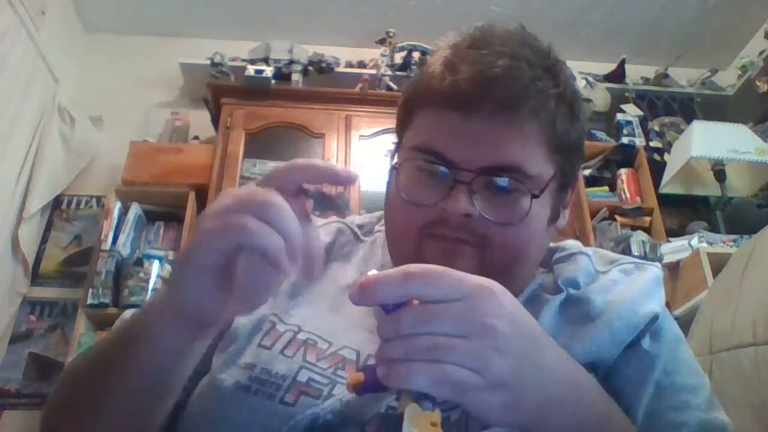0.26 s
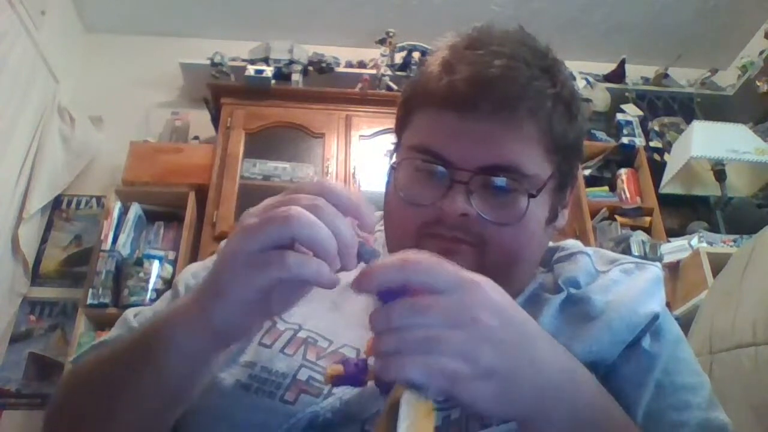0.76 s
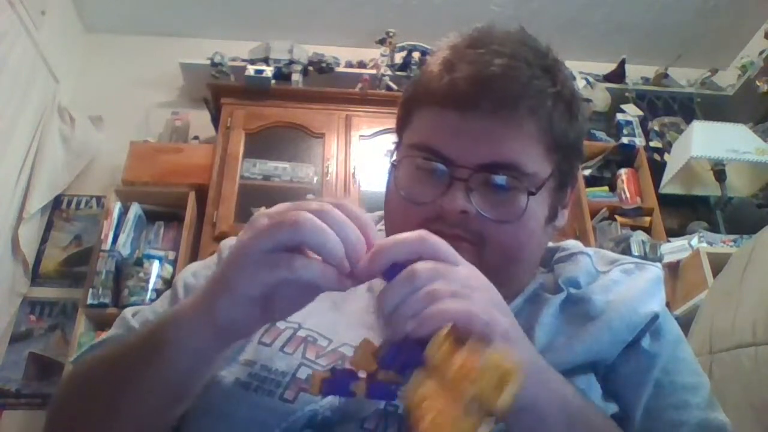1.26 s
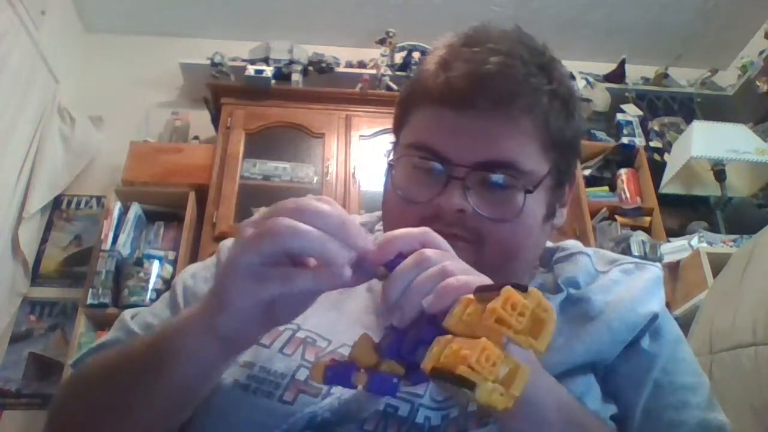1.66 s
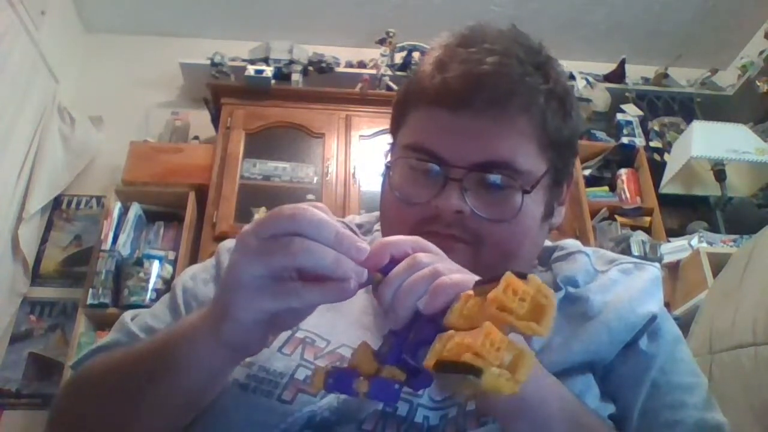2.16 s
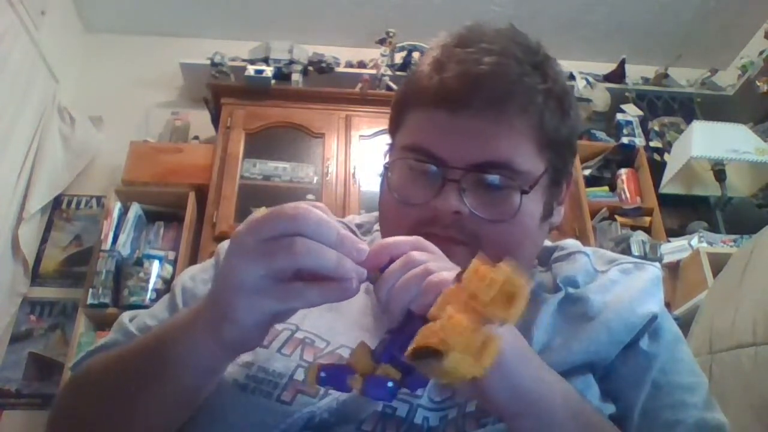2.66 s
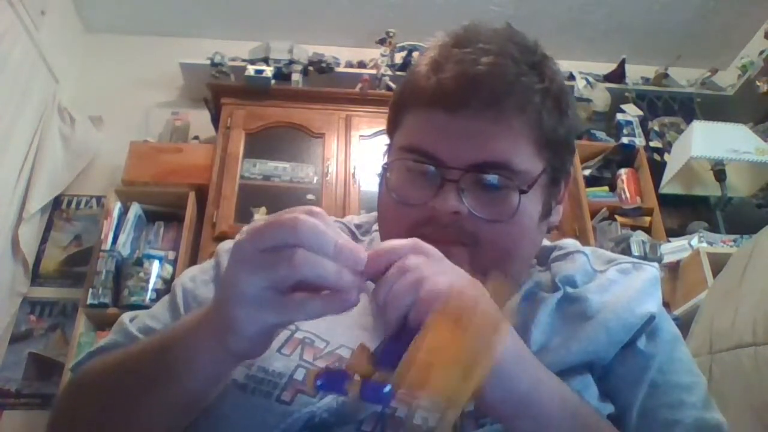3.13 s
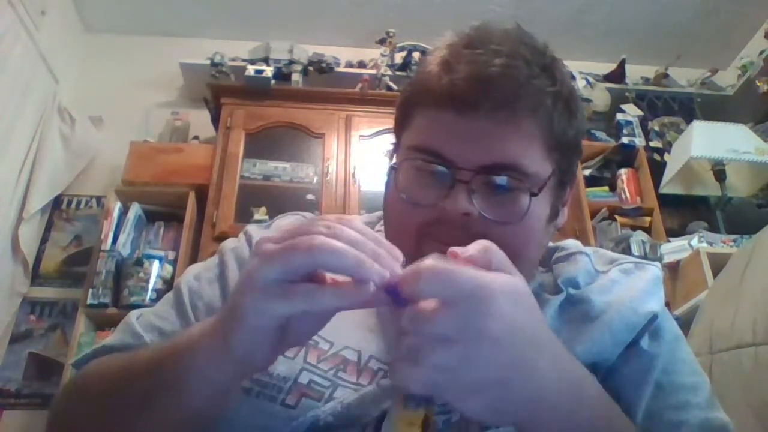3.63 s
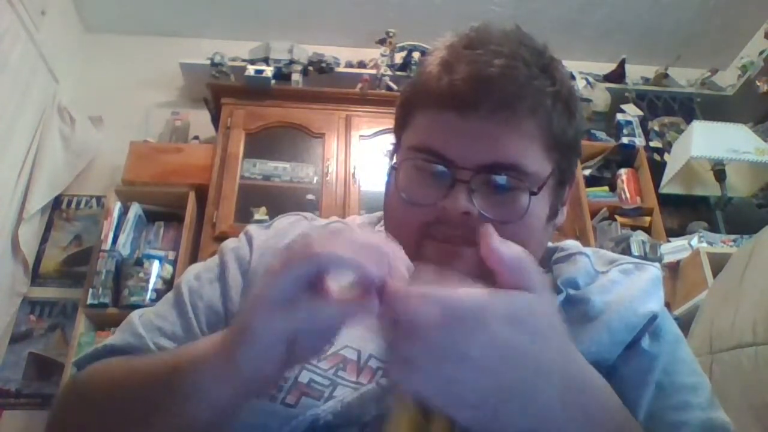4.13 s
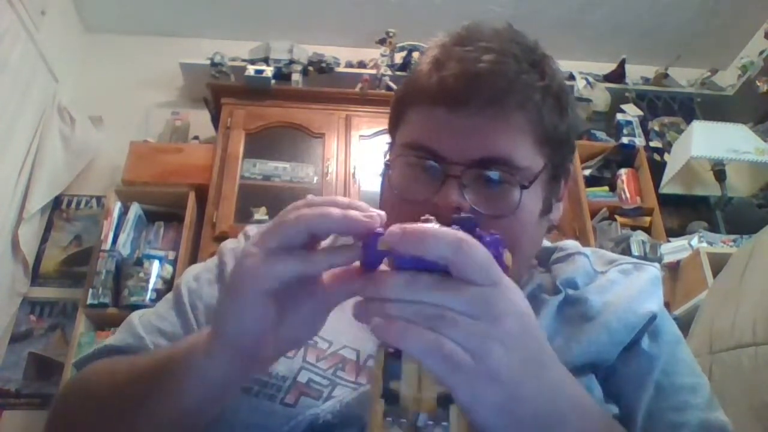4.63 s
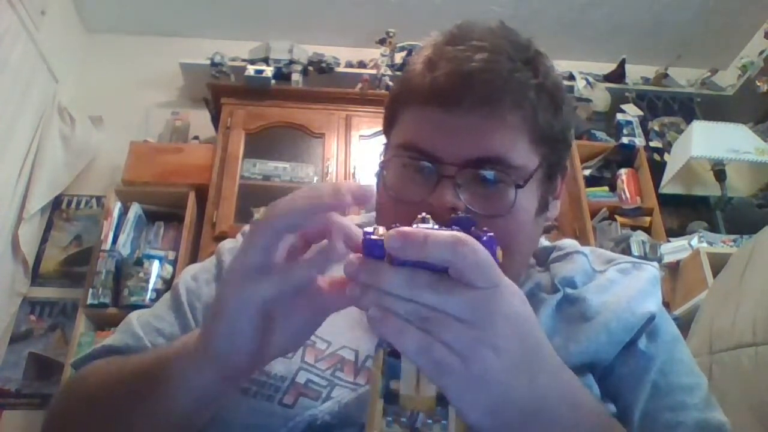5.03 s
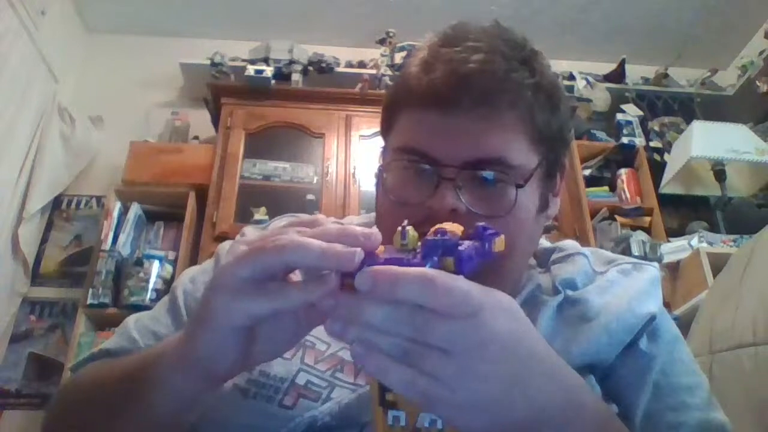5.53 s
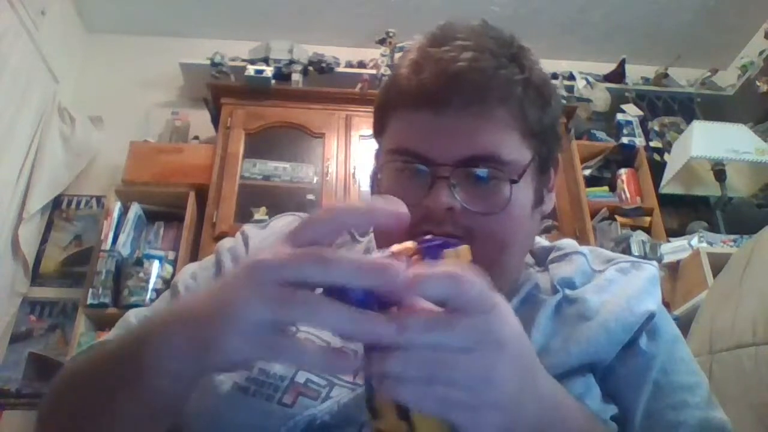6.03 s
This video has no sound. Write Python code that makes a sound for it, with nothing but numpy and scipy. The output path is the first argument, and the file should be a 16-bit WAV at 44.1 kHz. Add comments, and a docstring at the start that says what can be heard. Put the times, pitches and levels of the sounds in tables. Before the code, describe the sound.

Hands twist a small hard plastic toy close up: faint rubs and squeaks, hollow knocks, sharp bright snaps and light ticks in a quiet room.

```python
"""Hands work on a plastic toy figure, close to a laptop microphone, over rumble, hiss and a faint clock tick each second.
First fingers rub, a tab ticks, joints squeak and a bump leads to hollow knocks near 1.5 s; near 2.6 s a stiff joint
creaks and snaps, then knocks jolt the toy. Rubs, squeaks and light ticks follow, a knock at 4.7 s, a peg click
at 5.0 s, a last snap at 5.27 s and ticks. Parts are decaying modes plus cracking noise; rubs and bumps are swelling
noise. A noise suppressor holds the quiet down, opens on each snap and closes slowly."""
import sys
import numpy as np
from scipy import signal
from scipy.fft import rfft, irfft, next_fast_len
from scipy.io import wavfile
from scipy.ndimage import uniform_filter1d, map_coordinates

SR = 44100
rng = np.random.default_rng(int(sys.argv[2]) if len(sys.argv) > 2 else 0)


def generate_wav(signal):
    """Clip the signal to [-1, 1] and save it as 16-bit WAV at the path in sys.argv[1]."""
    frames = np.transpose(np.atleast_2d(signal))
    scaled = np.clip(frames, -1, 1) * 32767
    pcm = np.round(scaled).astype(np.int16)
    wavfile.write(sys.argv[1], SR, pcm)


N = 277124
TIME = np.arange(N) / SR
# All levels are set ahead of the suppressor; spectra are relative.
GRIP_HZ = 90.4  # how fast friction varies as the fingers catch and slide

# thud register of bumps, crack of the jolt: freq_hz, density_db (per Hz)
THUD_COLOUR = [(100, -38), (170, 0.5), (230, -0.5), (320, -7.5), (600, -39.5)]
# crack of the hollow shell and of the peg: freq_hz, density_db
SHELL_CRACK_COLOUR = [(200, -27), (450, -35), (680, -20), (1000, -33.5), (1280, -20), (1600, -4),
                      (2250, -2), (3000, -15), (4100, -3.5), (4900, -11), (7500, -30)]


def undb(db):
    """Decibels to gain."""
    return 10 ** (np.asarray(db) / 20)


def unit(x):
    """Scale to rms 1."""
    return x / np.sqrt(np.mean(x ** 2))


def colour(x, points):
    """Filter by (freq_hz, gain_db) points, interpolated over log frequency."""
    hz, db = np.transpose(points)
    size = next_fast_len(len(x))
    f = np.maximum(np.fft.rfftfreq(size, 1 / SR), 1)
    gain = undb(np.interp(np.log(f), np.log(hz), db))
    return irfft(rfft(x, size) * gain, size)[:len(x)]


def shade(x, points):
    """Colour a short sound without wrapping its start round to its end."""
    return colour(np.pad(x, (0, len(x))), points)[:len(x)]


def noise(points, size=N):
    """Coloured noise of rms 1."""
    return unit(colour(rng.standard_normal(size), points))


def swell(middle_s, half_length_s):
    """Gaussian rise and fall, down to exp(-2) at the half length."""
    return np.exp(-2 * np.minimum(((TIME - middle_s) / half_length_s) ** 2, 20))


def waver(hz, size=N):
    """Random wander of rms 1: straight lines between hz random values a second."""
    turns = np.arange(size) * hz / SR
    return unit(map_coordinates(rng.standard_normal(size), [turns], order=1))


def flicker(x, depth_db, top_hz=8000, size=512, frames=9):
    """Narrow bands waver, less so towards the top; output rms 1."""
    f, _, z = signal.stft(x, SR, nperseg=size)
    walk = uniform_filter1d(rng.standard_normal(z.shape), frames, axis=1)
    walk = unit(uniform_filter1d(walk, 2, axis=0))
    band_depth_db = depth_db / (1 + (f[:, None] / top_hz) ** 4)
    return unit(signal.istft(z * undb(band_depth_db * walk), SR, nperseg=size)[1][:N])


def add(out, start_s, x):
    """Mix a sound in at a time."""
    i = int(start_s * SR)
    out[i:i + len(x)] += x[:len(out) - i]


def background():
    """Room rumble and microphone hiss, each flickering band by band."""
    # low room noise: freq_hz, density_db (per Hz)
    rumble_colour = [(25, -39), (55, -34.5), (78, -1), (100, -3), (125, 1.5), (220, -1.5), (400, -12.5),
                     (700, -12.5), (1000, -19.5), (2000, -48)]
    # microphone noise: freq_hz, density_db (per Hz)
    hiss_colour = [(300, -16), (1200, -7.5), (1750, 2), (2800, -3.5), (3400, 0), (5500, -3), (7800, -6.5),
                   (8200, -3), (9600, 6.5), (12000, -0.5), (15600, -2.5)]
    rumble = undb(-63) * flicker(noise(rumble_colour), depth_db=3.0)
    hiss = undb(-50.5) * flicker(noise(hiss_colour), depth_db=3.5)
    return rumble + hiss


def clock():
    """A distant clock: one soft swell of coloured noise a second."""
    # clock tick: freq_hz, density_db (per Hz)
    tick_colour = [(800, -39), (1900, -10), (3000, -20), (3800, -15.5), (4050, -4.5), (4400, -16.5),
                   (6500, -19.5), (9000, -16)]
    first_s, half_length_s, level_db = 0.4305, 0.038, -46
    swells = sum(swell(first_s + k, half_length_s) for k in range(int(N / SR)))
    return undb(level_db) * noise(tick_colour) * swells


def bumps():
    """Soft hands thud against the toy: swelling noise in a boom, a thud and a hollow register."""
    # hand contacts: middle_s, half_length_s, boom_db, thud_db, hollow_db
    bump_events = [(0.825, 0.05, -60, -58.5, -77), (1.543, 0.027, -67, -70, -66),
                   (2.568, 0.046, -77, -54, -65), (2.864, 0.016, -62, -54.5, -51.5),
                   (2.919, 0.036, -62, -58, -60.5), (2.976, 0.18, -69, -61.5, -71),
                   (3.544, 0.0094, -71, -63, -56.5), (3.584, 0.061, -71.5, -61, -62),
                   (3.912, 0.038, -59, -62, -66), (4.157, 0.046, -63.5, -59.5, -78)]
    # lowest register: freq_hz, density_db (per Hz)
    boom_colour = [(50, -46.5), (85, -16.5), (125, -4), (160, -3), (300, -39.5)]
    # highest register: freq_hz, density_db (per Hz)
    hollow_colour = [(220, -36.5), (420, -7), (750, 3.5), (950, -15.5), (2000, -41)]
    boom, thud, hollow = noise(boom_colour), noise(THUD_COLOUR), noise(hollow_colour)
    out = np.zeros(N)
    for middle_s, half_length_s, boom_db, thud_db, hollow_db in bump_events:
        mix = undb(boom_db) * boom + undb(thud_db) * thud + undb(hollow_db) * hollow
        out += swell(middle_s, half_length_s) * mix
    return out


def strike(modes, crack, slip_s, ring_db, ring_time=1, crack_t60_s=0.03, detune=0.00033,
           span_s=0.0071, size=6144):
    """Modes and crack build up while the joint slips, then decay; energy equals rms 1 over the span."""
    t = np.arange(size) / SR

    def envelope(t60_s):
        rise = np.minimum(t / slip_s, 1) ** 1.1
        return rise * undb(-60 * np.maximum(t - slip_s, 0) / (t60_s * ring_time))

    ring = np.zeros(size)
    for hz, db, t60_s in modes:
        # the grip shifts each mode a little from strike to strike
        cycles = hz * (1 + detune * rng.standard_normal()) * t + rng.random()
        ring += undb(db) * envelope(t60_s) * np.sin(2 * np.pi * cycles)
    cracking = unit(envelope(crack_t60_s) * noise(crack, size=size))
    both = undb(ring_db) * unit(ring) + cracking
    return unit(both) * np.sqrt(span_s * SR / size)


def shell(slip_s, ring_db, bright_db=0, pitch=1, ring_time=1):
    """The hollow shell rings lowest, each limb at its own pitch; harder contact lifts the upper modes."""
    # hollow shell at pitch and ring_time 1: freq_hz, level_db, t60_s
    shell_modes = [(1661, -8.5, 0.054), (2251, -1, .06), (2343, 2, 0.074), (3450, 0, 0.03),
                   (4150, 4, 0.045), (4450, 1, 0.029)]
    modes = [(hz * pitch, db, t60_s) for hz, db, t60_s in shell_modes]
    x = strike(modes, SHELL_CRACK_COLOUR, slip_s, ring_db, ring_time)
    return shade(x, [(2400, 0.0012), (3500, bright_db)])


def socket(slip_s, ring_db, ring_time=1):
    """The stiff socket rings below the tabs."""
    # socket at ring_time 1: freq_hz, level_db, t60_s
    socket_modes = [(5445, -14.5, 0.0067), (6030, -8.5, 0.031), (6440, -2, 0.016), (6540, 0.5, 0.046)]
    # socket crack: freq_hz, density_db
    crack_colour = [(2800, -37), (3550, -17.5), (4200, -27.5), (5200, -5), (6400, -1.5), (7200, -12.5),
                    (8200, -3), (9500, -28)]
    return strike(socket_modes, crack_colour, slip_s, ring_db, ring_time)


def tab(slip_s, ring_db, tilt_db=0, ring_time=1, pitch=1):
    """A thin tab rings high and short; a slender one tilts to its top modes, a stubby one away."""
    # tab at pitch and ring_time 1, before tilt: freq_hz, level_db, t60_s
    tab_modes = [(8360, -20.5, 0.041), (8970, -8.5, 0.013), (9320, -9.5, 0.04), (9517, 3, 0.017),
                 (9300, 3.5, .036), (10020, -8, .018), (10040, -11, 0.025), (11000, -12, .026),
                 (11460, -14.5, 0.015), (13100, -16.5, 0.027), (14500, -22.5, 0.014)]
    # tab crack before tilt: freq_hz, density_db
    crack_colour = [(6500, -48), (8000, -12), (9300, -3), (10200, -0.5), (11200, -6.5), (12300, -14.5),
                    (13200, -14.5), (15000, -20), (16000, -40)]
    modes = [(hz * pitch, db, t60_s) for hz, db, t60_s in tab_modes]
    x = strike(modes, crack_colour, slip_s, ring_db, ring_time)
    tilted = shade(x, [(7800, -tilt_db), (9500, 0), (11500, tilt_db)])
    return np.std(x) * unit(tilted)  # tilt keeps the level


def rubs(grain_db=5, rate_hz=1200, slip_s=0.00062, ring_db=-7, bright_db=-7):
    """Uneven micro-slips scrape along an edge and ring the shell, over the rustle of skin."""
    # edges and fingers dragging: middle_s, half_length_s, edge_db, shell_db, skin_db, edge_pitch_factor
    rub_events = [(0, 0.37, -48, -51, -48, 1.02), (1.433, 0.042, -51, -44.5, -50, 1),
                  (1.51, 0.028, -45, -38.5, -50, 1), (3.161, 0.029, -47, -55, -53, 0.98),
                  (3.328, 0.21, -52, -64, -64, 1), (4.157, 0.045, -40, -62.5, -57.5, 0.99),
                  (4.225, 0.011, -42.5, -66.5, -53, 1.07), (4.401, 0.17, -47.5, -83.5, -65, 0.97),
                  (4.757, 0.045, -44, -66, -57, 0.97), (5.249, 0.016, -44, -71, -59.5, 0.96),
                  (5.752, 0.039, -48.5, -85, -62.5, 1)]
    # scraping edge at pitch 1: freq_hz, density_db (per Hz)
    scrape_colour = [(6000, -39), (7800, -12.5), (8900, 0.5), (10200, 2), (11300, -3), (12300, -8),
                     (15500, -19)]
    # fingertips sliding on plastic: freq_hz, density_db (per Hz)
    skin_colour = [(300, 2), (800, -8), (1200, 1), (1700, -11), (3000, 8.5), (5200, 6), (7000, 3.5),
                   (12000, -7)]
    grip_db = 1  # rms friction variation

    def slips():
        sizes = undb(grain_db * np.clip(rng.standard_normal(N), -2, 2))
        signs = np.sign(rng.standard_normal(N))
        return sizes * signs * (rng.random(N) < rate_hz / SR)

    out, edge, skin = np.zeros(N), slips(), noise(skin_colour)
    body = unit(signal.fftconvolve(slips(), shell(slip_s, ring_db, bright_db))[:N])
    grip = unit(undb(grip_db * waver(GRIP_HZ)))
    for middle_s, half_length_s, edge_db, shell_db, skin_db, pitch in rub_events:
        pressure = swell(middle_s, half_length_s) * grip
        on = pressure > 1e-4
        scrape = unit(shade(edge[on], [(hz * pitch, db) for hz, db in scrape_colour]))
        mix = undb(edge_db) * scrape + undb(shell_db) * body[on] + undb(skin_db) * skin[on]
        out[on] += pressure[on] * mix
    return out


def squeaks():
    """A tight joint sticks and slips as it turns, keeping one unsteady resonance going."""
    # grating joints: middle_s, half_length_s, pitch_hz, level_db
    squeak_events = [(0.191, 0.012, 9500, -42.5), (.395, 0.02, 10400, -42), (0.694, 0.014, 10960, -48),
                     (2.835, .03, 1800, -54), (3.167, 0.037, 5700, -51.5), (3.45, 0.1, 1810, -58),
                     (3.499, 0.043, 4860, -55.5), (4.44, .04, 4100, -57.5), (4.768, 0.024, 8100, -47)]
    width, wander = .08, 0.015  # fluctuation rate and rms pitch unsteadiness, shares of the pitch
    out = np.zeros(N)
    for middle_s, half_length_s, hz, db in squeak_events:
        pressure = swell(middle_s, half_length_s)
        on = pressure > 1e-3
        size = int(on.sum())
        pitch_hz = hz * (1 + wander * waver(GRIP_HZ, size=size))
        phase = 2 * np.pi * np.cumsum(pitch_hz) / SR
        slips = waver(hz * width, size=size) + 1j * waver(hz * width, size=size)
        out[on] += undb(db) * pressure[on] * np.real(slips * np.exp(1j * phase))
    return out


def jolt():
    """A hard knock jolts the whole toy in the hands: low modes and a thump of noise."""
    # whole toy: freq_hz, level_db, t60_s
    jolt_modes = [(89, -29, 0.34), (119, 3.5, .3), (161, -2.5, 0.083), (259, -3, 0.2), (278, 2.5, .15)]
    start_s, level_db, rise_s, ring_db = 2.852, -39.5, 0.0054, 6.5
    out = np.zeros(N)
    thump = strike(jolt_modes, THUD_COLOUR, rise_s, ring_db, crack_t60_s=0.29, size=16384)
    add(out, start_s, undb(level_db) * thump)
    return out


def pegs():
    """A tab cracks as the peg goes home, and the peg rings on in a few clear modes."""
    # peg clicking into its hole and rattling: start_s, peg_db, tab_db
    peg_clicks = [(5.0005, -36.5, -25.5), (5.0235, -42.5, -42), (5.071, -49, -62)]
    # peg: freq_hz, level_db, t60_s
    peg_modes = [(2200, -1, .07), (2430, -1, .035), (2676, 0, 0.038), (4075, 1.5, .04), (7260, 1.5, 0.044)]
    slip_s, ring_db, tab_ring_db, tab_tilt_db = 0.00114, 27, -0.5, -5.5  # ring over crack
    out = np.zeros(N)
    for start_s, peg_db, tab_db in peg_clicks:
        add(out, start_s, undb(peg_db) * strike(peg_modes, SHELL_CRACK_COLOUR, slip_s, ring_db))
        add(out, start_s, undb(tab_db) * tab(slip_s, tab_ring_db, tab_tilt_db))
    return out


def ticks():
    """Light flicks past a catch ring a tab and barely reach the shell of a small limb."""
    # tab flicks: start_s, level_db, tab_tilt_db
    tick_events = [(0.104, -40.5, 0), (2.601, -35, -10), (3.916, -39.5, 4.5), (4.299, -29.5, 8.5),
                   (4.318, -48, 9), (4.499, -33, 3), (4.652, -45, 12), (5.2815, -43, 10),
                   (5.614, -40.5, -2), (5.748, -37.5, 3)]
    slip_s, ring_db = 0.003, 1  # ring over crack
    shell_db, shell_pitch = -18, 1.45  # shell against tab
    out = np.zeros(N)
    for start_s, db, tilt_db in tick_events:
        flick = tab(slip_s, ring_db, tilt_db)
        limb = undb(shell_db) * shell(slip_s, ring_db, pitch=shell_pitch)
        add(out, start_s, undb(db) * (flick + limb))
    return out


def knocks():
    """A hollow part hits its stop or rebounds, ringing shell, socket and tab in its own mix."""
    # contacts: start_s, shell_db, socket_db, tab_db, slip_s, ring_over_crack_db, shell_pitch_factor,
    # upper_shell_modes_db, shell_ring_time_factor, tab_tilt_db
    knock_events = [(1.405, -33, -43, -42, 0.001, -5.5, 0.72, -23, 2.6, 9),
                    (1.494, -35, -60, -48, 0.0012, 10, 0.67, -9, 1.6, 0),
                    (1.5208, -32.5, -37, -37, 0.0018, -17, 1.4, 0, 0.83, 2),
                    (1.5235, -26, -52, -47, 0.00045, 14, 1.02, -10.5, 0.22, 4),
                    (2.8499, -28.5, -44, -23.5, 0.00093, 8, 1.05, 3.5, 0.5, 2),
                    (2.853, -26.5, -51, -46, 0.00046, 12.5, 0.99, 1, 0.5, -3.5),
                    (2.865, -35, -35, -33.5, 0.005, 1.5, 1.02, 3, 0.77, 11),
                    (2.883, -43, -37, -49, 0.0012, -33, 1, 4, 1.1, 5),
                    (4.6935, -37.5, -58, -48, 0.0004, 29, 1.07, -16.5, 0.63, -3),
                    (4.71, -46, -48, -48, .001, 9, 1.2, -9.5, 1, 6.5)]
    tab_ring_db = -4  # a knocked tab cracks more than it rings
    out = np.zeros(N)
    for (start_s, shell_db, socket_db, tab_db, slip_s, ring_db, pitch, bright_db,
         ring_time, tilt_db) in knock_events:
        add(out, start_s, undb(shell_db) * shell(slip_s, ring_db, bright_db, pitch, ring_time))
        add(out, start_s, undb(socket_db) * socket(slip_s, ring_db))
        add(out, start_s, undb(tab_db) * tab(slip_s, tab_ring_db, tilt_db))
    return out


def snaps():
    """A joint creaks, then gives: tabs and socket ring hard, shell faintly; a tight grip shortens the ring."""
    # jumps in the socket: start_s, tab_db, socket_db, tab_tilt_db, tab_ring_over_crack_db,
    # ring_time_factor, tab_pitch_factor
    snap_events = [(2.612, -19.5, -38, 1, 7.5, 1, 1.02), (2.6165, -21, -34.5, 3, 4, 1, 0.9),
                   (2.6178, -19.5, -29.5, -0.5, 11, 0.79, 1.005), (5.271, -32, -29.5, -9.5, 4, 0.56, .87),
                   (5.2731, -28, -37.5, -6.5, 3, 0.45, 1.02)]
    creak_lead_s, creak_slip_s = 0.0069, 0.0017
    creak_db, creak_ring_db = -11.5, -5  # against tab; ring over crack
    slip_s, socket_ring_db = 0.0014, 9  # the shell has the same ring over crack
    shell_db, bright_db, shell_rise_s = -23.5, -5.5, 0.0057  # against tab; upper modes
    out = np.zeros(N)
    for start_s, tab_db, socket_db, tilt_db, ring_db, ring_time, pitch in snap_events:
        creak = socket(creak_slip_s, creak_ring_db)
        add(out, start_s - creak_lead_s, undb(tab_db + creak_db) * creak)
        add(out, start_s, undb(tab_db) * tab(slip_s, ring_db, tilt_db, ring_time, pitch))
        add(out, start_s, undb(socket_db) * socket(slip_s, socket_ring_db, ring_time))
        body = shell(shell_rise_s, socket_ring_db, bright_db, ring_time=ring_time)
        add(out, start_s, undb(tab_db + shell_db) * body)
    return out


def room(x, gap_s=0.0086, size=22050):
    """Decaying noise after a short gap: dense early reflections and a fainter tail, fullest near 2 kHz."""
    # late tail: freq_hz, gain_db
    tail_colour = [(200, 1), (700, 2), (1200, -1.5), (1950, 12.5), (2900, 2.5), (3600, 5), (6000, 0.5),
                   (9500, -2.5), (15000, -6.5)]
    early_t60_s, early_db, late_t60_s, late_db = 0.081, -11.5, .6, -22
    t = np.arange(size) / SR

    def reflections(t60_s):
        tail = rng.standard_normal(size) * undb(-60 * t / t60_s) * (t > gap_s)
        return tail / np.linalg.norm(tail)

    early = undb(early_db) * reflections(early_t60_s)
    late = undb(late_db) * shade(reflections(late_t60_s), tail_colour)
    return x + signal.fftconvolve(x, early + late)[:N]


def scene():
    """The toy in its room, over background and clock."""
    toy = ticks() + snaps() + knocks() + pegs() + jolt() + rubs() + squeaks() + bumps()
    return (background() + clock() + room(toy))[None]


def suppress(x, threshold_db=-49, range_db=32, bass_depth_db=6, mid_depth_db=23, top_depth_db=19,
             release_s=0.35, knee=3.52, split_hz=600, top_hz=8000, size=176):
    """Noise suppressor: treble level opens three bands at once; they close slowly to their own depths."""
    bass = signal.sosfiltfilt(signal.butter(2, split_hz, fs=SR, output="sos"), x)
    treble = x - bass
    mid = signal.sosfiltfilt(signal.butter(8, top_hz, fs=SR, output="sos"), treble)
    top = treble - mid
    heard_db = 10 * np.log10(np.abs(uniform_filter1d(treble ** 2, size)) + 1e-18)
    opening = np.clip((heard_db - threshold_db) / range_db, 0, 1) ** knee
    # peak hold with exponential release
    fade = np.exp(-TIME / release_s)
    closed = 1 - np.maximum.accumulate(opening / fade, axis=-1) * fade
    quiet_bass = bass * undb(-bass_depth_db * closed)
    quiet_mid = mid * undb(-mid_depth_db * closed)
    return quiet_bass + quiet_mid + top * undb(-top_depth_db * closed)


def record(dry, low_cut_hz=52, top_cut_hz=15800):
    """The laptop suppresses noise and cuts the deep bass and the top."""
    high_pass = signal.butter(2, low_cut_hz, "high", fs=SR, output="sos")
    thin = signal.sosfilt(high_pass, suppress(dry))
    return signal.sosfilt(signal.ellip(10, .2, 70, top_cut_hz, fs=SR, output="sos"), thin)


dry = scene()
out = record(dry)
generate_wav(out)
```